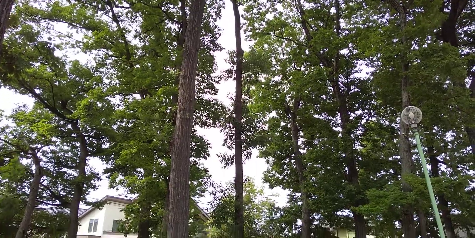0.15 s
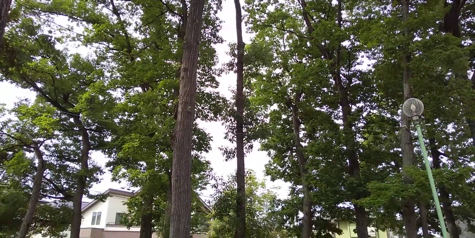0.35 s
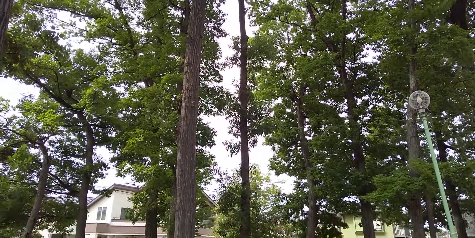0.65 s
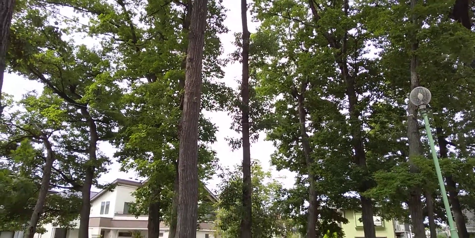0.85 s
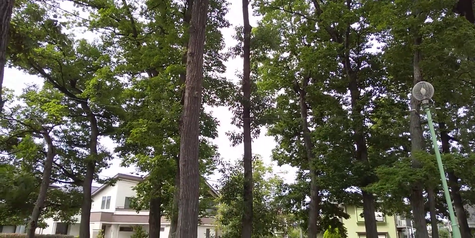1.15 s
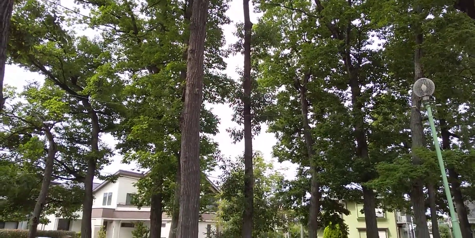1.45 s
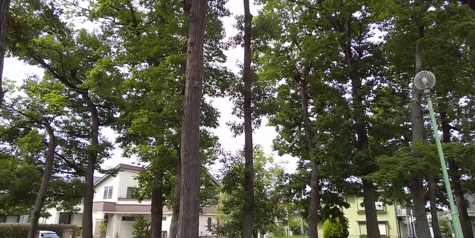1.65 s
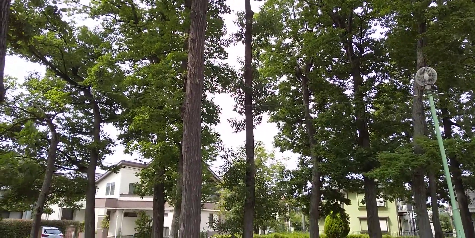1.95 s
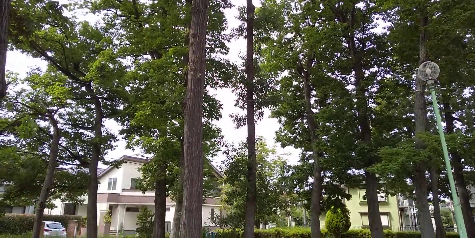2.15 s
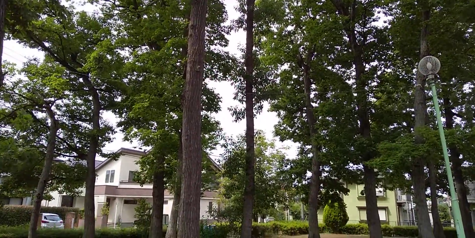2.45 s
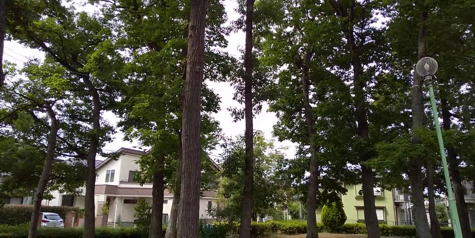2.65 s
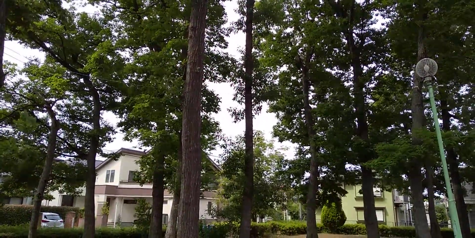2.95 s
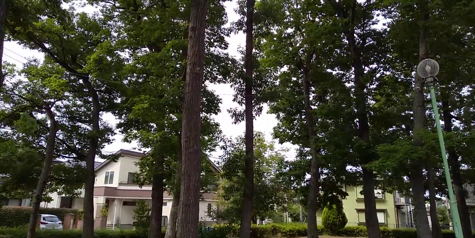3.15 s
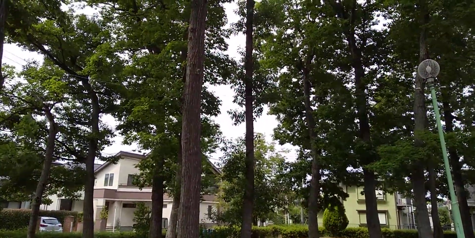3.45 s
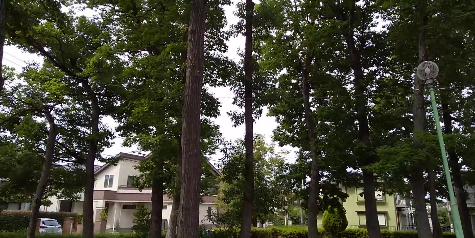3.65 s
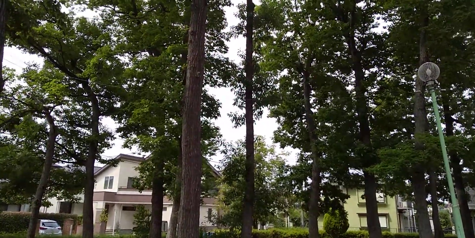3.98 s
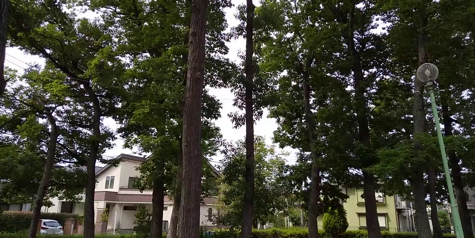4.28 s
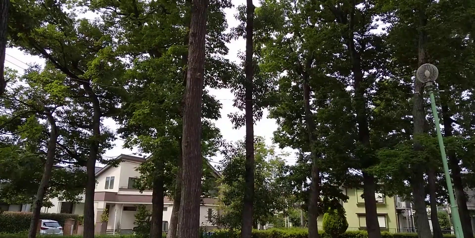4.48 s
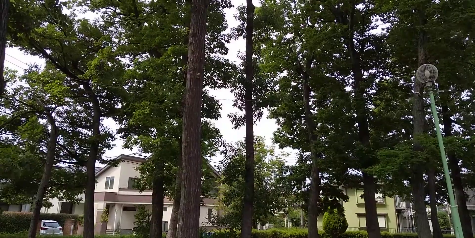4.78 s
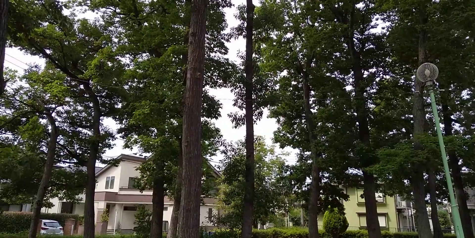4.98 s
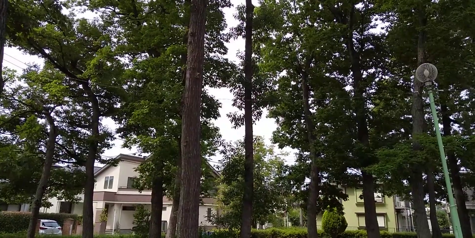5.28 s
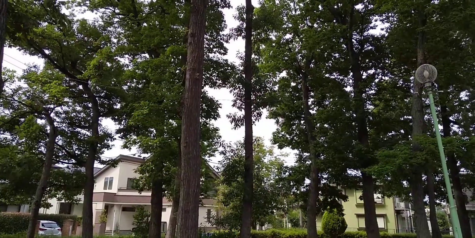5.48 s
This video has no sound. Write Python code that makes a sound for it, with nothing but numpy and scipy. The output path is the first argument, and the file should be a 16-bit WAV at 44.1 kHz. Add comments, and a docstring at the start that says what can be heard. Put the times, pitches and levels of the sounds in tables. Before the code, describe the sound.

Outdoors among tall park trees near houses, wind rumbles and thumps directly on the microphone, strongest at the start and again late. A cuckoo whistles its falling two-note call about every 1.4 seconds, soft and echoing off walls and trunks. After four seconds a closer crow gives rough, rattling caws, the last one loudest and cut off by the end. Faint leaf hiss and a low traffic hum lie beneath.

```python
"""Park trees with houses around: a cuckoo repeats its two notes and a crow nearby caws three times.
The cuckoo is whistled tones with echoes off walls and trunks; the crow is a rattling pulse train and
breath noise through a throat. Gusts roll pressure eddies over the microphone port. Leaves and far traffic
are patchy coloured noise over a low hum, and a few small dry clicks fall close by."""
import sys
import numpy as np
from scipy import signal
from scipy.fft import rfft, irfft, next_fast_len
from scipy.io import wavfile
from scipy.ndimage import uniform_filter1d, map_coordinates

SR = 44100
rng = np.random.default_rng(int(sys.argv[2]) if len(sys.argv) > 2 else 0)


def wav_out(sig):
    """Save sig, one row per channel (or a flat mono array), as 16-bit PCM at SR to the path in sys.argv[1]."""
    wavfile.write(sys.argv[1], SR, np.round(np.clip(np.atleast_2d(sig).T, -1, 1) * 32767).astype(np.int16))


N = 247842

TOP_HZ = 15800  # band limit of the microphone chain
LEAD = SR // 2  # samples of sound before time zero, whose echoes are still heard

# Wind: a buffet hits fast and drains slower, down to a lull
RISE_DB_PER_S, FALL_DB_PER_S, LULL_DB = 1202.5, 452, -60
SMALL_DB, SMALL_MS = -4.5, 1.06  # lesser eddies: typical size over the buffet level, usual half width

# Crow: a faint croak leads in, then the voice snaps open below its peak; effort gives out at the end
CROAK_S, CROAK_DB, SNAP_S, OPEN_DB = 0.045, -25, 0.018, -7.5
FADE_S, END_DB, SHUT_S = 0.11, -13, 0.02  # the beak closes within SHUT_S
START_HZ, CLIMB_S, SAG_HZ_PER_S, LOW_HZ = 296, 0.03, 450, 298  # pitch climbs, holds, sags to a floor
SLOWS_HZ_PER_S = 26.9  # the rattle slows

# Cuckoo's second note
OO_HZ, OO_ATTACK_S, OO_LENGTH_S, OO_RELEASE_S = 652, 0.023, 0.14, 0.026
OO_WAVER_S, OO_WAVER_DB = 0.102, -6  # the level bends here on its way to the closing level
LINGER_DB, LINGER_S = -13, 0.015  # the note lingers off the near houses
ANSWER_S, ANSWER_LENGTH_S = 0.234, 0.13  # far wall: delay, length
CUCK_SCATTER_DB, OO_SCATTER_DB = -5, -16.5  # each note's share in the trees


def amp(db):
    """Amplitude factor of a level in dB."""
    return 10 ** (np.asarray(db) / 20)


def unit(x):
    """x scaled to an rms of one."""
    return x / np.sqrt(np.mean(x ** 2) + 1e-20)


def along(points, hz):
    """(f/Hz, value) points read off on a log frequency axis."""
    f, v = np.transpose(points)
    return np.interp(np.log(hz + 1), np.log(f + 1), v)


def curves(rows):
    """Sample times over the rows' span and one value per sample for each column."""
    s, *cols = np.transpose(rows)
    t = np.arange(s[0], s[-1], 1 / SR)
    return [t] + [np.interp(t, s, c) for c in cols]


def wobble(rate, size):
    """A smooth random curve, rate knots a second."""
    knots = rng.standard_normal(int(size * rate / SR) + 4)
    return map_coordinates(knots, [np.arange(size) * rate / SR])


def filtered(x, response):
    """x times a response of frequency."""
    m = next_fast_len(len(x) + SR // 2)
    return irfft(rfft(x, m) * response(np.fft.rfftfreq(m, 1 / SR)), m)[:len(x)]


def add(track, s, sound):
    """Mix a sound into a track that starts LEAD samples early."""
    part = track[LEAD + round(s * SR):][:len(sound)]
    part += sound[:len(part)]


def trees(x, onset):
    """Scattering off trunks and houses: builds up over onset seconds, each frequency dies at its own speed."""
    # Decay of the scattered sound: f/Hz, t60/s
    decay = [(300, 2.5), (900, 0.94), (1500, 0.89), (3000, 1.8), (6000, 0.26), (12000, 0.32)]
    hz, t, z = signal.stft(rng.standard_normal(2 * SR), SR, nperseg=256)
    shape = amp(-60 * t / along(decay, hz)[:, None]) * (1 - np.exp(-t / onset))
    shape = shape / np.linalg.norm(shape, axis=1)[:, None]
    tail = signal.istft(z * shape, SR, nperseg=256)[1]
    return signal.fftconvolve(x, tail / np.linalg.norm(tail))[:len(x)]


def air():
    """Leaves and far traffic: coloured noise in faint patches, over a wavering low hum."""
    # Spectrum of the hiss before its overall level is set: f/Hz, level/dB per Hz
    colour = [(20, -36.5), (50, 0), (100, 1), (140, -47), (230, -15.5), (500, -23), (1100, -19),
              (1700, -22.5), (2500, -30), (3500, -33), (5500, -30), (6800, -37.5), (8500, -36),
              (11000, -44), (14300, -44), (14450, -100)]
    z = signal.stft(rng.standard_normal(N + 512), nperseg=512)[2]
    field = rng.standard_normal(z.shape)
    field = uniform_filter1d(uniform_filter1d(field, 6, 0), 12, 1)  # smooth in frequency, then time
    patchy = signal.istft(z * amp(1.4 * unit(field)), nperseg=512)[1][:N]
    hiss = amp(-50.0) * unit(filtered(patchy, lambda f: amp(along(colour, f))))
    hum_hz = 97 + 3.8 * wobble(3.09, N)
    hum_level = amp(-61 + 2.7 * wobble(4, N))
    return hiss + hum_level * np.sin(2 * np.pi * np.cumsum(hum_hz) / SR)


def port(f):
    """Microphone port: steep cuts of the deep bass and a roll-off of the treble."""
    x = f / 50
    bass_cut = (x * x / (x * x - 1 - 1j * 0.91 * x)) ** 2
    return bass_cut * f ** 6 / (f ** 6 + 42.0 ** 6) / (1 + (f / 800) ** 4)


def eddies(s, size, width_ms):
    """Pressure bumps passing the port; the narrower, the higher they reach."""
    k = np.arange(-900, 900)
    half_width = SR * np.abs(width_ms)[:, None] / 1000  # samples
    bumps = size[:, None] / (1 + (k / half_width) ** 2)
    at = np.round(s * SR).astype(int)[:, None] + k + 900
    return np.bincount(at.ravel(), bumps.ravel(), N + 2000)[900:N + 900]


def buffets(t):
    """Wind strength at times t: each gust rises and drains exponentially around its full length."""
    # Gusts at the microphone: t/s, length/s, level/dB
    gusts = [(0, 0.13, -17.5), (0.19, 0.13, -25.5), (0.411, 0.086, -31.5), (0.548, 0.064, -16.5),
             (0.973, 0.17, -41.5), (1.2, 0.043, -46.5), (1.373, 0.037, -29.5), (1.471, 0.07, -23),
             (1.593, 0.058, -20.5), (1.719, 0.046, -29), (1.83, 0.066, -27), (2.067, 0.084, -27),
             (2.162, 0.14, -24), (2.374, .16, -26.5), (2.651, 0.28, -38), (2.846, 0.21, -34),
             (3.196, 0.17, -37), (3.458, 0.031, -32), (3.731, 0.048, -44.5), (3.939, 0.11, -31.5),
             (4.2, 0.14, -33), (4.402, 0.071, -19.5), (4.53, 0.031, -30), (4.622, 0.089, -16),
             (4.745, 0.11, -16.5), (4.897, 0.25, -22), (5.209, .05, -32), (5.367, 0.016, -35),
             (5.423, 0.083, -30), (5.496, 0.085, -25.5)]
    strength = amp(LULL_DB)
    for s, length, db in gusts:
        rise = RISE_DB_PER_S * np.clip(s - t, 0, None)
        fall = FALL_DB_PER_S * np.clip(t - s - length, 0, None)
        strength = strength + amp(db - rise - fall)
    return strength


def wind():
    """A dense stream of broad eddies swells with each buffet; narrow ones stand out as thumps."""
    # Strong single eddies, ahead of the port: t/s, peak level/dB, half width/ms
    thumps = [(0.033, -9.5, 0.26), (0.045, -0.5, 0.14), (0.113, -12.5, 0.64), (0.132, -11.5, 0.32),
              (0.146, -9.5, 0.58), (0.165, -9.5, 0.82), (0.28, -7.5, 0.36), (0.529, -16.5, 1.2),
              (0.572, -8, 0.5), (0.589, -10.5, 0.47), (0.605, -16.5, 0.52), (0.623, -25, 3.2),
              (1.382, -22.5, 0.64), (1.506, -13.5, 1.24), (1.623, -13.5, 0.66), (1.656, -11, 0.76),
              (1.844, -14, 1.34), (2.07, -19, 1.8), (2.204, -16.5, 0.95), (2.243, -17, 1.27),
              (2.305, -22, 2), (2.39, -17, 0.97), (2.504, -14.5, 2), (2.847, -13, 1.8),
              (3.009, -15.5, 1.66), (3.941, -17, 2.1), (3.999, -18, 1.47), (4.394, -15, 0.84),
              (4.416, -8, 1.18), (4.626, -4.5, 1.1), (4.659, -14, 0.92), (4.758, -4.5, 0.43),
              (4.803, -8, 0.62), (4.857, -10, 1.28), (4.978, -11.5, 0.86), (4.997, -8, 0.13),
              (5.021, -9.5, 0.94), (5.373, -16, 1.63), (5.535, -6, 1.17), (5.563, -16.5, 0.7)]
    t = np.arange(N) / SR
    gust = buffets(t)

    draw = rng.standard_normal((1100, 2))
    s = (np.arange(len(draw)) + rng.random(len(draw))) * (N - 1) / SR / len(draw)
    stream = filtered(eddies(s, draw[:, 0], 2.84 * np.exp(0.34 * draw[:, 1])), port)
    # within a gust the flow keeps rocking the membrane about equally hard
    power = np.abs(uniform_filter1d(stream ** 2, size=1500) + 1e-9)
    stream = unit(stream / power ** 0.15)
    stream *= gust * amp(2.1 * wobble(14, N))

    s, db, width = np.transpose(thumps)
    strong = eddies(s, amp(db) * rng.choice([-1, 1], len(s)), width)
    s, draw = rng.random(450) * t[-1], rng.standard_normal((450, 2))
    size = amp(SMALL_DB) * np.interp(s, t, gust) * draw[:, 0]
    small = eddies(s, size, SMALL_MS * np.exp(0.3 * draw[:, 1]))
    return stream + filtered(strong + small, port)


def ticks():
    """Small dry clicks close by: an impulse, then a short burst of fading noise."""
    # Clicks, level ahead of their filter: t/s, level/dB, treble roll-off f/Hz, t60/s
    clicks = [(2.215, -41, 3500, .008), (2.222, -45, 4000, .03), (4.337, -20, 7500, .0004),
              (4.8015, -45, 5000, .005)]
    out, t = np.zeros(N + LEAD), np.arange(900) / SR
    for s, db, hz, t60 in clicks:
        snap = (t == 0) * 3
        rustle = 1.4 * (t > 0.0003) * rng.standard_normal(len(t))
        click = (snap + rustle) * amp(-60 * t / t60)
        add(out, s, amp(db) * filtered(click, lambda f: f / (f - 1500j) / (1 + (f / hz) ** 2)))
    return out[LEAD:]


def caw(s, length, peak_db, swell, top_hz, held, rattle_hz):
    """Effort, pitch and rattle rate of one caw: it snaps open, swells, sags and gives out."""
    end = s + length
    t, db = curves([(s - CROAK_S, peak_db + CROAK_DB - 5), (s - SNAP_S, peak_db + CROAK_DB),
                    (s, peak_db + OPEN_DB), (s + swell, peak_db), (end - FADE_S, peak_db),
                    (end - 0.22 * FADE_S, peak_db + 0.5 * END_DB), (end, peak_db + END_DB),
                    (end + SHUT_S, peak_db + 3 * END_DB)])
    climb = np.sin(np.pi / 2 * np.clip((t - s) / CLIMB_S, 0, 1))
    sag = np.clip(SAG_HZ_PER_S * (t - s - held), 0, top_hz - LOW_HZ)
    hz = START_HZ + (top_hz - START_HZ) * climb - sag
    return t, db, hz, rattle_hz - SLOWS_HZ_PER_S * (t - s)


def voice_pulses(turn):
    """Soft pulses of 23 partials whose spread phases blunt them; strong and weak ones alternate."""
    order = np.arange(1, 24)[:, None]
    partials = np.cos(order * turn + 0.902 * order ** 2) / (1 + (order / 8) ** 4)
    partials = partials * amp(6.5 * (order == 4))  # the beak follows the fourth partial
    return unit(partials.sum(axis=0)) * (1 + 0.38 * np.cos(turn / 2 + 0.8))


def crow():
    """A harsh pulse train whose pitch and strength are shaken about fifty times a second, through the throat."""
    # Caws: t/s, length/s, peak effort level/dB, swell/s, top pitch f/Hz, pitch held/s,
    # rattle f/Hz, a rattle peak t/s
    caws = [(4.161, 0.27, -19, .08, 336, .13, 54.47, 4.294),
            (4.866, 0.27, -17.5, .04, 343.2, .06, 55.9, 4.969),
            (5.564, 0.39, -13.5, 0.061, 304.4, .1, 52.9, 5.585)]
    # Throat resonances: f/Hz, level/dB
    resonances = [(150, -61.5), (330, -28), (680, -22), (850, -17.5), (1000, -13), (1100, -2), (1280, -3),
                  (1500, -1), (1700, -6), (1900, -26.5), (2300, -24), (3000, -55), (3550, -47.5),
                  (3900, -54.5), (4600, -44), (5100, -54), (5600, -49.5), (6200, -66), (7500, -63),
                  (10000, -71), (14000, -92)]
    throat = lambda f: amp(along(resonances, f))
    source = np.zeros(N + LEAD)
    for *shape, peak in caws:
        t, db, hz, rattle_hz = caw(*shape)
        size = len(t)
        beat = np.cumsum(rattle_hz) / SR
        beat = 2 * np.pi * (beat - np.interp(peak, t, beat)) + 0.18 * wobble(33.2, size)
        shaken_hz = hz * (1 + 0.042 * np.cos(beat - 0.6) + 0.01273 * wobble(149.7, size))
        turn = 2 * np.pi * np.cumsum(shaken_hz) / SR
        pulses = voice_pulses(turn)
        breath = rng.standard_normal(size) * np.exp(0.55 * np.cos(turn))  # air escapes once a cycle

        swell = np.exp(0.5 * np.cos(beat)) * amp(1.4 * wobble(118, size))
        voice = unit(filtered(swell * (pulses + 0.22 * breath), throat))
        # hoarse below the main band
        voice += 1.4 * filtered(swell * breath, lambda f: throat(f) / (1 + (f / 900) ** 8))

        # the rasp above the voice comes in puffs, one per rattle
        puffs = np.exp(0.6 * np.cos(beat)) * amp(1.5 * wobble(40, size)) * breath
        rasp = unit(filtered(puffs, lambda f: throat(f) / (1 + (2800 / (f + 1)) ** 12)))
        # each rattle snaps in the treble
        snap = np.exp(30 * (np.cos(beat) - 1)) * amp(6 * wobble(50, size)) * rng.standard_normal(size)
        crackle = filtered(snap, lambda f: (f / 7000) ** 2 / (1 + (f / 7000) ** 7))
        treble = amp(-30.5) * rasp + amp(-32) * crackle
        treble *= amp(0.6 * (db + 21))  # grows faster than the voice with effort
        add(source, t[0], amp(db) * (voice + treble))
    wall = amp(-9.5) * np.pad(source, (round(0.09 * SR), 0))[:len(source)]
    return (source + wall + amp(-8.5) * trees(source, onset=0.015))[LEAD:]


def whistle(t, hz, db, fifth=0):
    """A tone at rms level db with a faint share of its fifth partial, fading at both ends."""
    fade = np.clip(np.minimum(t - t[0], t[-1] - t) / 0.011, 0, 1)
    turn = 2 * np.pi * np.cumsum(hz) / SR
    return np.sqrt(2) * fade * amp(db) * (np.sin(turn) + fifth * np.sin(5 * turn))


def first_notes():
    """The high note: a whistle whose pitch arches up and back."""
    # One note: t/s, pitch f/Hz, level/dB relative to the note's own
    arch = [(0, 660, -32), (.013, 715, -17), (.024, 815, -11), (.034, 838, -4), (.052, 850, 0),
            (.072, 885, -6), (.086, 830, -1), (.097, 720, -9), (.11, 665, -24)]
    # Notes, two of them faint and a little flat: t/s, level/dB, pitch factor
    calls = [(-.14, -28.5, 1), (.262, -43, .97), (1.247, -30, 1), (2.656, -29.5, 1), (3.075, -43, .97),
             (4.03, -29, 1), (5.382, -28.5, 1)]
    high = np.zeros(N + LEAD)
    t, hz, shape_db = curves(arch)
    for s, db, factor in calls:
        add(high, s, whistle(t, factor * hz, db + shape_db, fifth=0.011))
    return high


def second_notes():
    """The low note: a steadier whistle that lingers and is answered by a far wall."""
    # Notes: t/s, level/dB, closing level/dB, far wall's answer level/dB
    calls = [(.185, -35, -47, -51.5), (1.585, -34.5, -32.5, -48), (2.995, -37, -44.5, -55.5),
             (4.347, -35, -30, -45.5)]
    low = np.zeros(N + LEAD)
    end, back = OO_LENGTH_S + OO_RELEASE_S, ANSWER_S + OO_ATTACK_S
    answer_end = ANSWER_S + ANSWER_LENGTH_S
    for s, db, closing_db, answer_db in calls:
        t, level_db = curves([
            (0, db - 24), (OO_ATTACK_S, db),
            (OO_WAVER_S - OO_ATTACK_S, db), (OO_WAVER_S, db + OO_WAVER_DB),
            (OO_WAVER_S + OO_RELEASE_S, closing_db), (OO_LENGTH_S, closing_db),
            (end, db + LINGER_DB), (end + LINGER_S, db + LINGER_DB),
            (ANSWER_S, answer_db - 23), (back, answer_db),
            (answer_end - OO_RELEASE_S, answer_db), (answer_end, answer_db - 12)])
        hz = OO_HZ + 2.5 * wobble(25, len(t))
        add(low, s, whistle(t, hz, level_db + 1.5 * wobble(30, len(t))))
    return low


def cuckoo():
    """Two whistled notes in the echoes of walls and trunks; the high note scatters more."""
    # Echoes of the first note: delay t/s, level/dB
    walls = [(.048, -16), (.185, -18.5)]
    high, low = first_notes(), second_notes()
    echoes = sum(amp(db) * np.pad(high, (round(lag * SR), 0))[:len(high)] for lag, db in walls)
    scattered = trees(amp(CUCK_SCATTER_DB) * high + amp(OO_SCATTER_DB) * low, onset=0.0064)
    return (high + low + echoes + scattered)[LEAD:]


def scene():
    """All sources as they reach the one microphone."""
    return (air() + wind() + ticks() + crow() + cuckoo())[None]


def record(dry):
    """The microphone chain keeps nothing above its band limit."""
    return filtered(dry[0], lambda hz: hz < TOP_HZ)[None]


dry = scene()
out = record(dry)
wav_out(out)
```